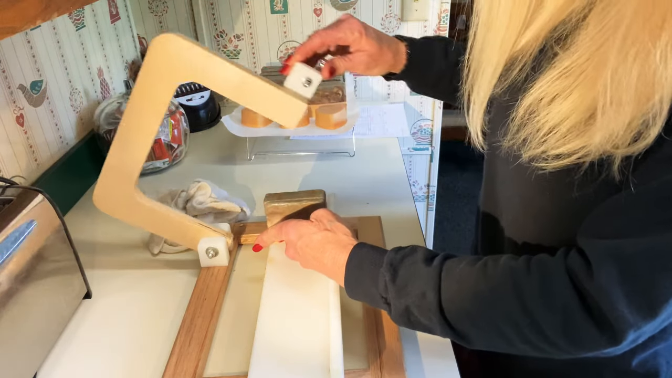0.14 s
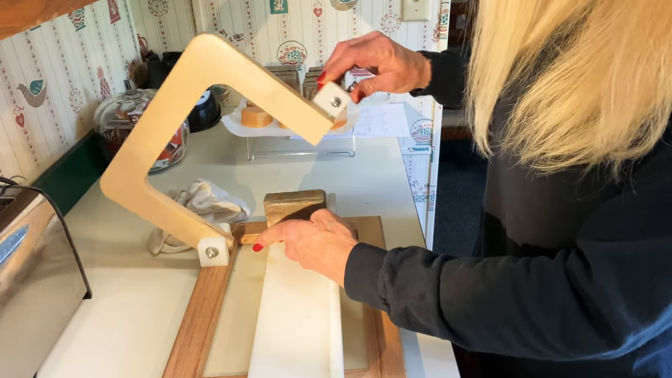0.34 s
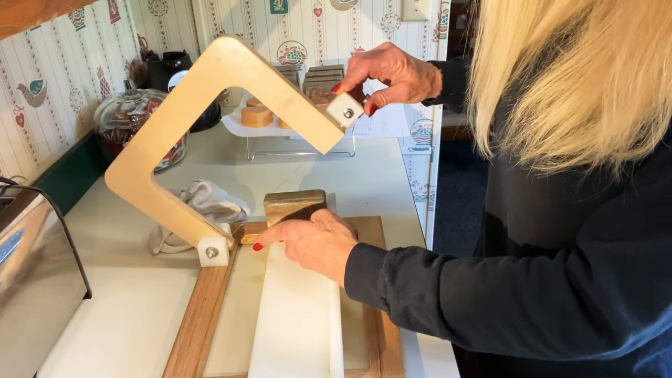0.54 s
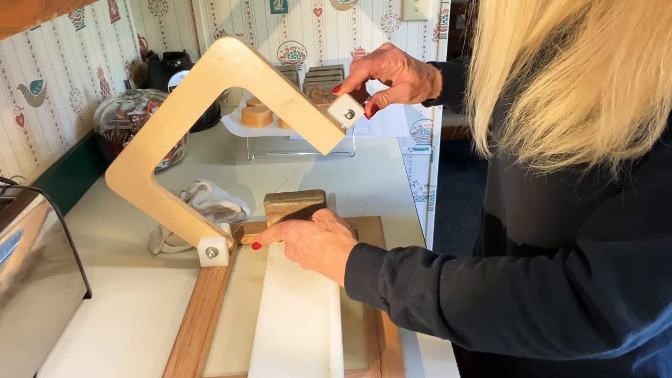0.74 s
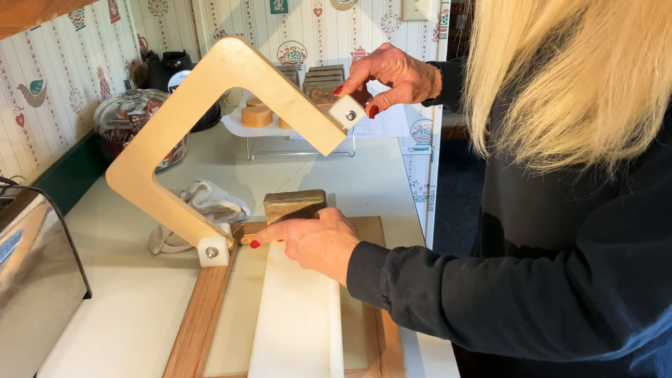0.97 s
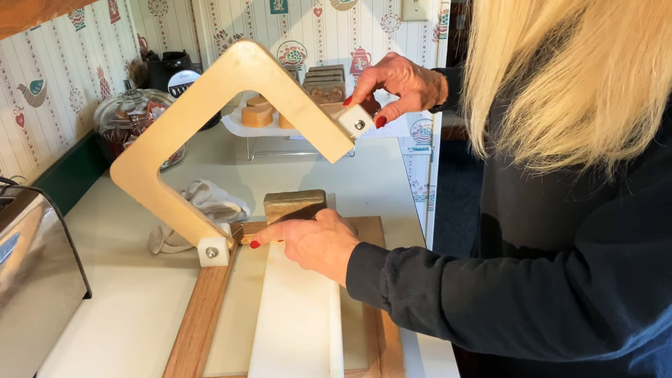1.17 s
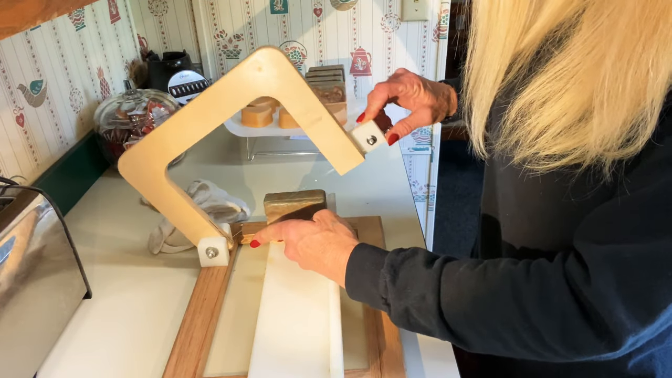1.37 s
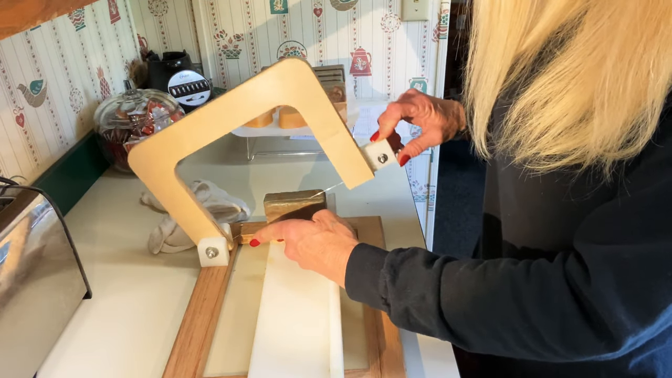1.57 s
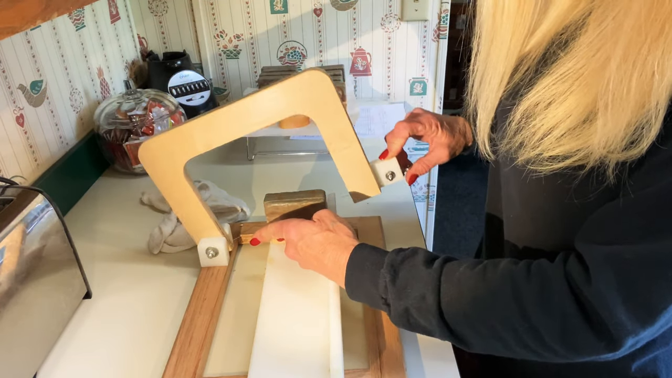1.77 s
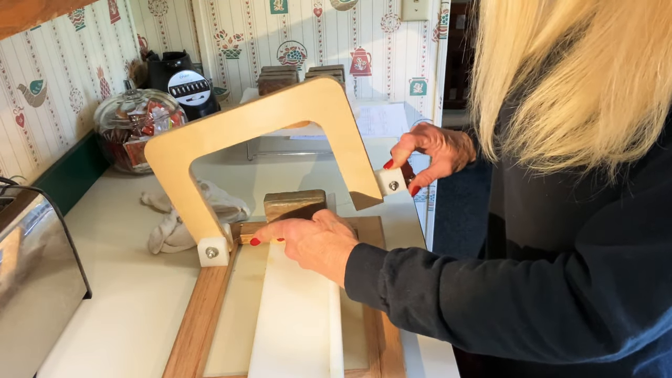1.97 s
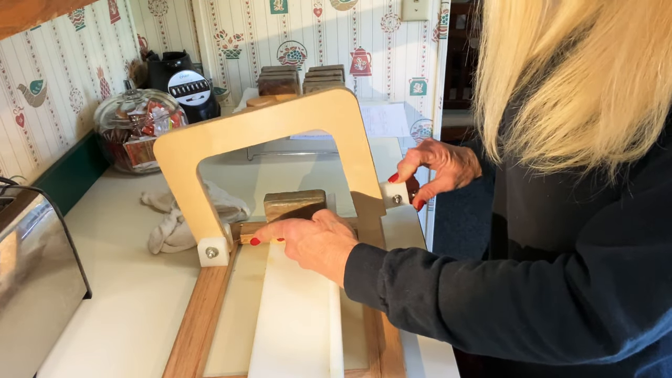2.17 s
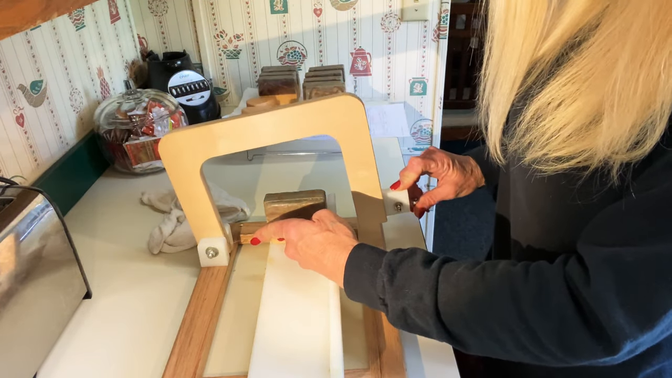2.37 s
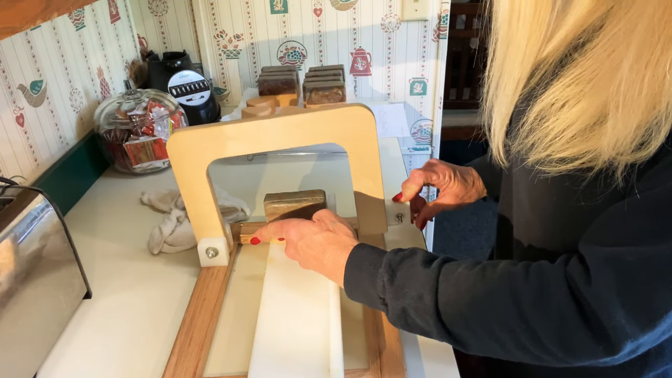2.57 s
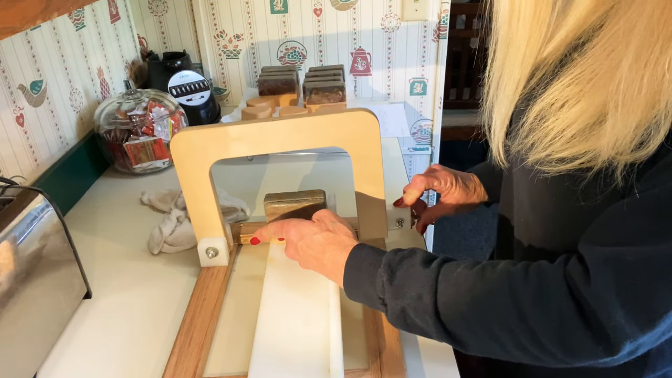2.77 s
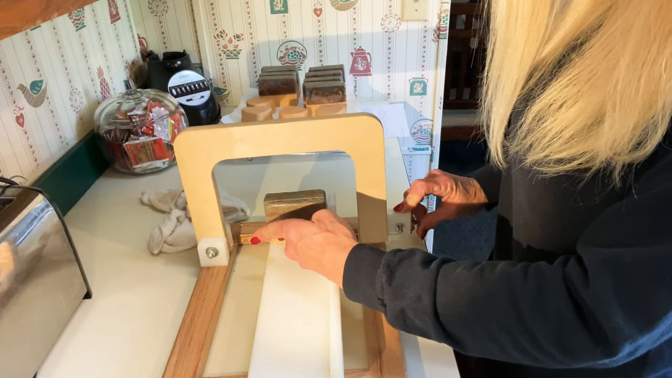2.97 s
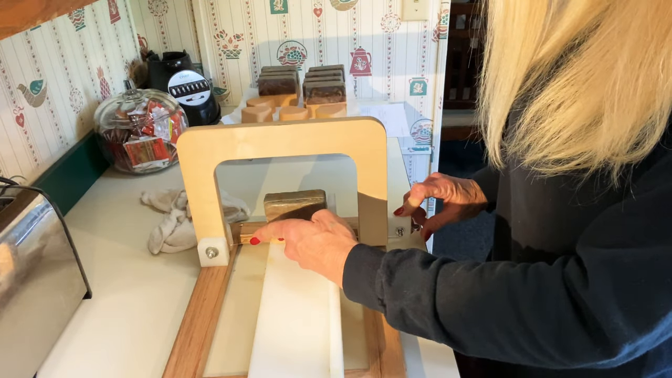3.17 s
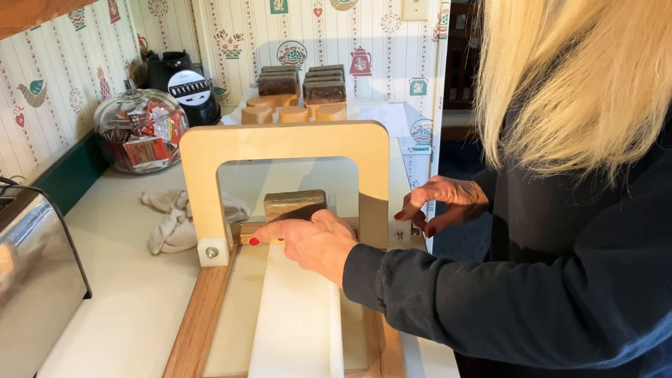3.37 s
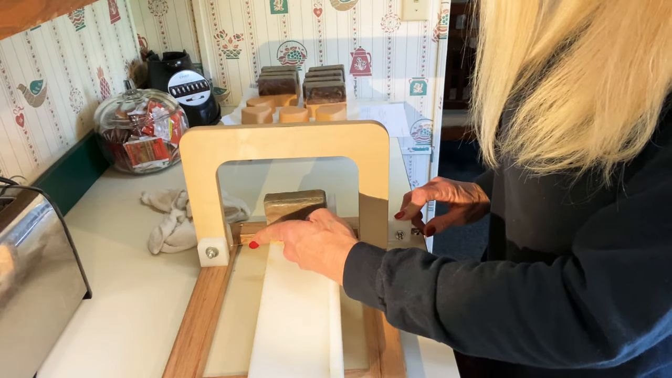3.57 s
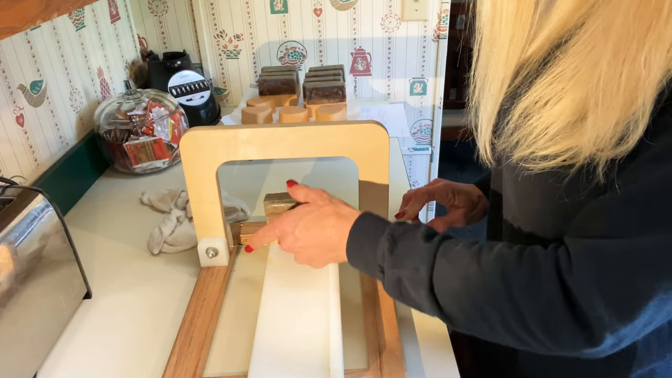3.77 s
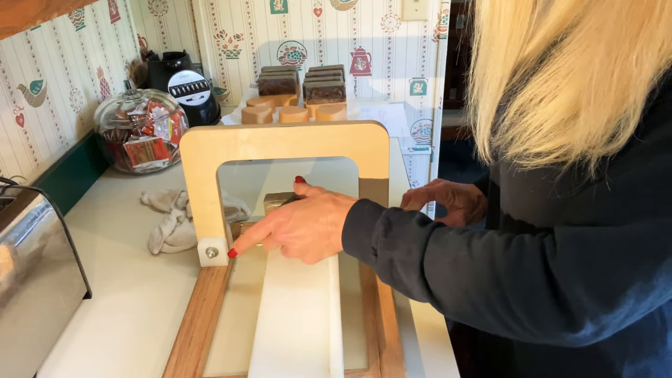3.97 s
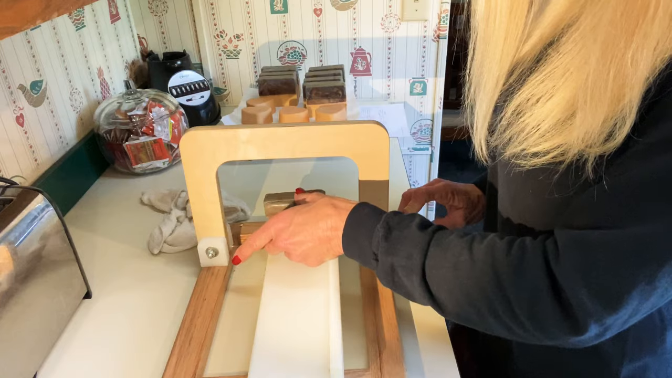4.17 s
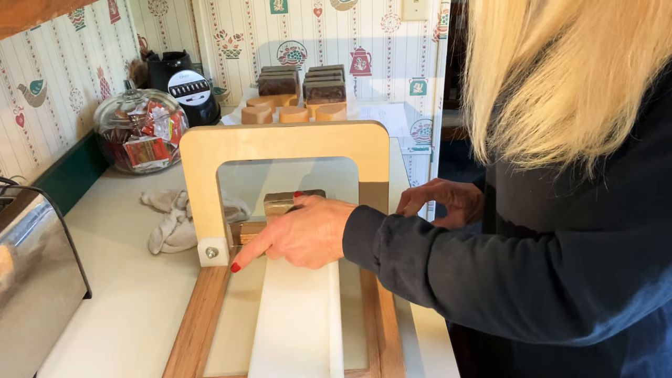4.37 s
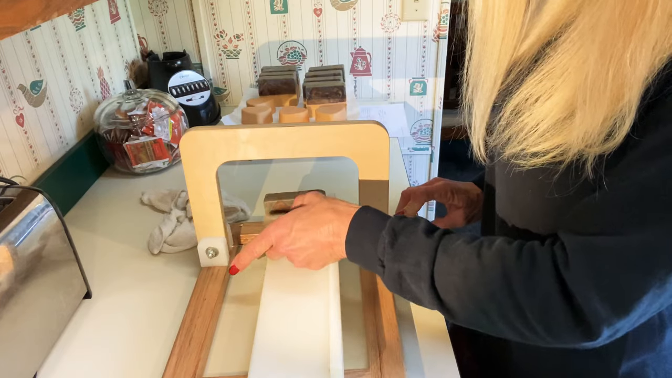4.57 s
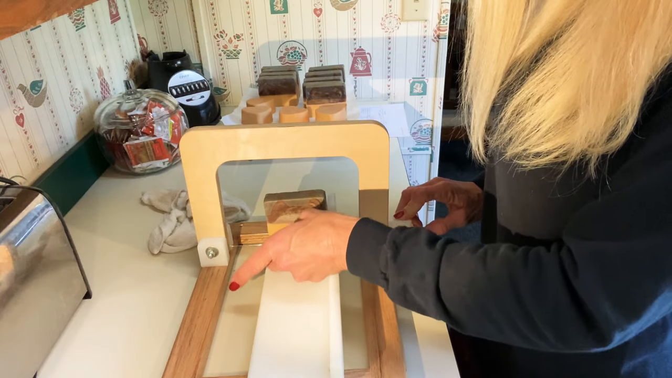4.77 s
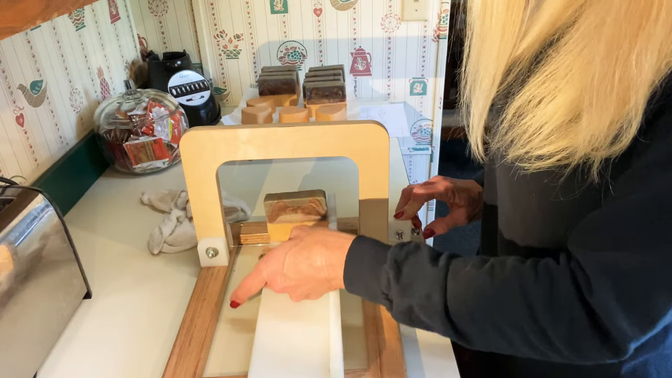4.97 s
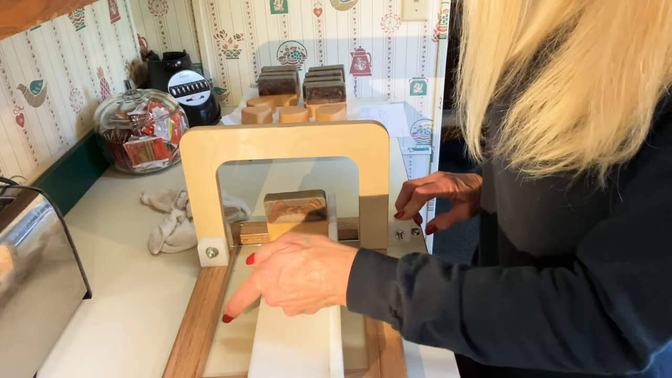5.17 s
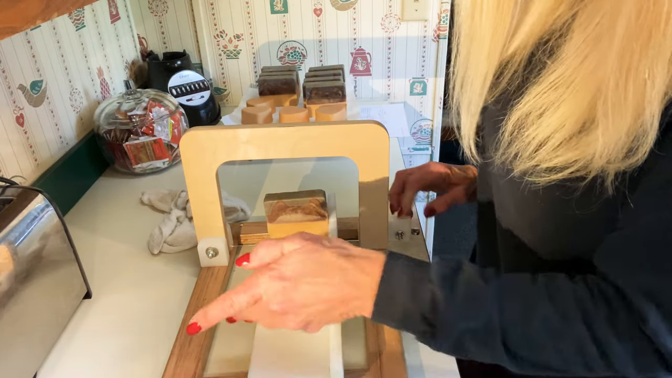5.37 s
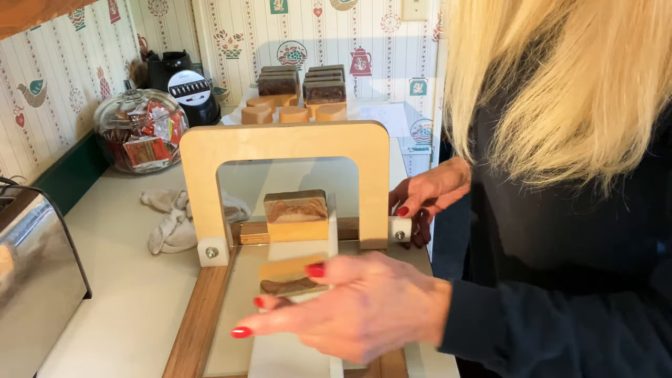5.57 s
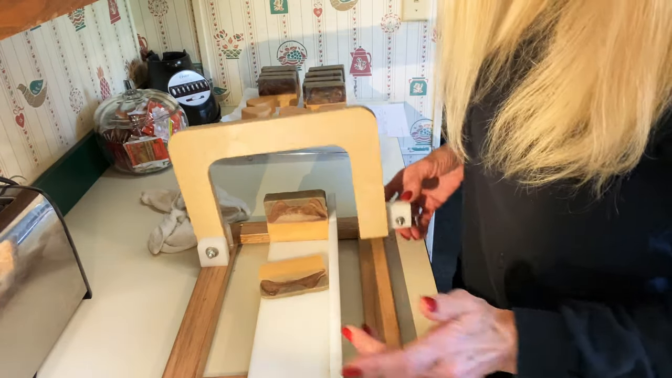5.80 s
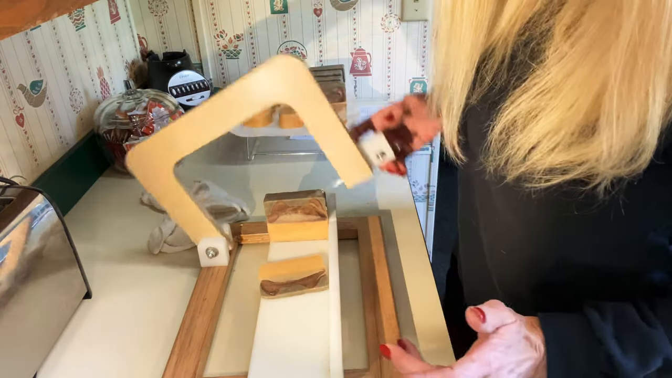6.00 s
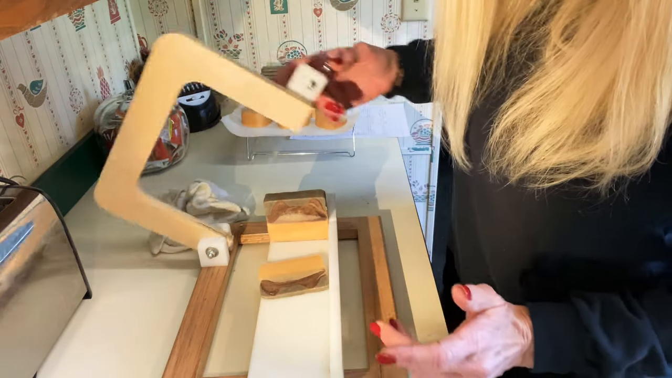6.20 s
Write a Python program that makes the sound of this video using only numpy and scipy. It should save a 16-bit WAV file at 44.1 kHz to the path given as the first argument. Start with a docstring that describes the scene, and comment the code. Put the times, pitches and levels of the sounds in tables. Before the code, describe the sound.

A faint fridge hum and soft low air noise run throughout in a small kitchen, with the action close by. At the start a wooden soap cutter bumps lightly, and its pivot rubs with a faint, thin, high squeak until 0.6 seconds. From 1.3 to 3.1 seconds the wire slips through the soap in quiet, dry, irregular ticks, busiest around 2.5, with a few soft early bumps. At 3.4 the arm strikes its base with a loud, hollow wooden knock. At 3.6 the freed wire gives a low twang and a raspy buzz, damped by 3.9, leaving a faint ring. A light click comes at 4.7. Around 5.3 the slice scrapes and drops with a loud cluster of thumps, then is pushed aside with smaller clicks and a brief slide. A soft thud follows at 5.9 as the pivot faintly rubs and squeaks again.

```python
"""A wooden-framed wire cutter swings down through a soap loaf on a kitchen counter, near a two-port
microphone. First friction makes the pivot rub and squeak; from 1.3 s the wire ticks through the soap in
small slips. At 3.4 s the arm strikes the base, and at 3.6 s the freed wire twangs and buzzes in its slot.
After 5 s the slice drops and is pushed aside, and the pivot squeaks again.
A fridge hums throughout in the small room."""
import sys
import numpy as np
from scipy import signal
from scipy.fft import rfft, irfft, next_fast_len
from scipy.io import wavfile
from scipy.ndimage import uniform_filter1d

SR = 44100
rng = np.random.default_rng(int(sys.argv[2]) if len(sys.argv) > 2 else 0)


def wav_out(sig):
    """Save sig, one row per channel (or a flat mono array), as 16-bit PCM at SR to the path in sys.argv[1]."""
    wavfile.write(sys.argv[1], SR, np.round(np.clip(np.atleast_2d(sig).T, -1, 1) * 32767).astype(np.int16))


N = 275303
T = np.arange(N) / SR
RELEASE_S = 3.641  # the wire springs free

# a finger damps the wire: t/s, gain/dB
FINGER_DAMPING = [(0, 0), (3.885, 0), (3.905, -12)]


def knocks():
    """Impact excitation: a rough contact cracks and clatters; the modes of the base answer 3.5 ms later."""
    # t/s, crack/dB, hardness/dB, top band gain/dB, thud/dB, place (0 counter, 1 board, 2 hollow edge),
    # contact time/ms, factor on the t60 (less under a hand)
    blows = [(0.087, -76, -14, -2.5, -53.5, 1.1, 8.9, .9), (0.106, -53.5, -5.5, 1, -40, 1.6, 5.7, 1),
             (0.128, -59.5, -1.5, -11, -36.5, 1.74, 16, 0.48),
             (1.148, -78, -22, -2.5, -45.5, 1.3, 17, 0.71), (1.547, -78, -10, -2.5, -47, 1.2, 2.4, 1),
             (1.679, -83, -14, -2.5, -44, 1.2, 7.2, 0.96), (3.371, -18.5, -13, -13, -25.5, 0.91, 4.1, 0.9),
             (3.378, -47, -30, -4, -15.5, .95, 4.1, 0.81), (3.399, -50, -4, 2, -20.5, 0.9, 5.8, .9),
             (3.409, -49, 3, -2, -30, 1.7, 4, .9), (3.647, -43.5, 1.5, 5, -29, 1.6, 5.1, 0.63),
             (4.654, -47.5, 0, -0.5, -40, 1.35, 4.3, 0.9), (5.151, -69.5, -0.5, 8, -40.5, 0.075, 7, 0.65),
             (5.296, -31.5, -6, 0, -25.5, 2.1, 8.3, 0.58), (5.305, -41, -22, -6, -17, 2.2, 4.2, .6),
             (5.310, -41, -20, -6, -18.5, 0.02, 6, 0.47), (5.320, -43, -24, -1, -22.5, 2.2, 5, 0.52),
             (5.344, -40.5, -32, -3, -31, 2.05, 8.4, 0.64), (5.360, -51, -5, -3, -28, 0.3, 9.9, 0.35),
             (5.496, -44, -0.5, 6, -39.5, 1.6, 14, 0.26), (5.506, -51.5, 7.5, 2, -48, 0.45, 2.4, 0.99),
             (5.509, -35.5, -42, -2.5, -34.5, 1.6, 4.9, 0.5), (5.537, -61, -9, -2.5, -52, 1.8, 6, 0.8),
             (5.559, -46.5, 0, -10, -41.5, 2.9, 5.5, 0.49), (5.594, -45.5, -17, 9, -55, 0.44, 14, 0.55),
             (5.638, -52.5, -8, -2.5, -55, 0.087, 18, 0.77), (5.91, -59.5, -5.5, -13, -35, 0.42, 9.1, 1)]
    # lower and upper resonances of the arm: f/Hz, width/Hz, level/dB
    arm_low = [(844, 78, -6.5), (980, 160, -8), (1075, 60, -10), (1243, 160, 1), (1485, 130, -6.5),
               (1670, 250, -5.5)]
    arm_high = [(2070, 450, 6), (2723, 150, 0), (3416, 233, 0), (3390, 240, 0.5), (4380, 470, -4)]
    # modes of the counter, the base board and the air beneath: f/Hz, level/dB, t60/s
    counter = [(64.8, -7.5, 0.086), (91.6, 14.5, 0.31), (116, 7, 0.193)]
    board = [(199.6, 2.5, 0.17), (231.3, 4, 0.18)]
    hollow = [(295, -1.5, 0.19), (328, -3.5, 0.11), (417, -1.5, 0.16), (459, -8, 0.14), (535, -20, 0.18)]
    # radiation of the counter: f/Hz, gain/dB
    radiation = [(30, -17), (60, 0.5), (470, -1.5), (620, -9.5)]
    cracks, thuds, t = np.zeros(N), np.zeros(N), T[:SR // 5]
    ms = 1000 * t
    push = -np.sin(np.pi * np.minimum(ms / 2.28, 1)) ** 2
    clatter = np.exp(-t / 0.034) * np.minimum(t / 0.013, 1)
    for s, crack_db, hard_db, top_db, thud_db, place, contact_ms, free in blows:
        contact = np.exp(-ms / contact_ms) * np.minimum(ms / (0.041 * contact_ms), 1)
        upper_db = crack_db + 4.5 + 0.71 * hard_db
        grit = rng.standard_normal((7, len(t)))
        for noise, modes, level_db in ((grit[0], arm_low, crack_db), (grit[1], arm_high, upper_db)):
            crack = 0
            for hz, width, db in modes:
                force = noise * contact ** (1 + hz / 4000)  # higher modes die sooner
                crack += peak(steep(force, hz, width), db + rng.standard_normal())
            add(cracks, s, peak(crack, level_db))
        rattle = grit[2] * (contact + undb(-19) * clatter)
        click = steep(rattle, 7450, 4000) + undb(top_db) * steep(rattle, 11800, 2300)
        add(cracks, s, peak(click, crack_db + 3 + 2.5 * hard_db))
        # the clatter is too dense to show single modes
        add(cracks, s, peak(steep(grit[3] * clatter, 1300, 1000), crack_db - 11.5))
        add(cracks, s, peak(steep(grit[4] * clatter, 2800, 1900), upper_db - 13))
        rough = grit[5] * contact * np.minimum(ms / 2.5, 1)
        rough = np.convolve(rough, np.hanning(int(0.0018 * SR)))[:len(t)]
        thud = peak(steep(grit[6] * clatter, 269, 475), thud_db - 9)
        for k, modes in enumerate((counter, board, hollow)):
            body = ring(push + peak(rough, -8), np.array(modes) * [1, 1, free])
            thud += peak(body, thud_db - 11 * (place - k) ** 2)  # weaker away from the blow
        add(thuds, s + 0.0035, thud)
    return cracks + colour(thuds, radiation)


def wire_twang():
    """Free vibration: the released wire rings in decaying modes, most of them then damped by a finger."""
    # force pulses on release: t/s, level/dB
    plucks = [(3.645, -27), (3.6535, -26.5), (3.662, -18)]
    # main modes, faint after-ring and upper partials of the wire: f/Hz, level/dB, t60/s
    modes = [(110, -13, 0.28), (231.5, -4, 0.51), (429, -7, 0.15), (464, -17, 0.33), (575, -43, 0.38),
             (742, -20, 0.32)]
    after_ring = [(245.4, -39.5, 3.4)]
    overtones = [(1220, -12.5, 1), (1530, -2, 1), (1483, 8, 0.29), (1870, -5.5, 0.96), (1970, -9, 0.51),
                 (2170, -11, 0.96), (2480, -3, 0.28), (2692, -23, .9), (2910, -6, 0.84), (2940, -8, 0.43),
                 (3470, -13, 0.76), (3720, 1, 1), (3700, -8.5, .9), (4030, -14, .8)]
    push, snap = np.zeros(N), np.zeros(N)
    for s, db in plucks:
        add(push, s, undb(db) * np.diff(np.hanning(100)))
    snap[int(RELEASE_S * SR)] = undb(-54)
    touch = undb(np.interp(T, *np.transpose(FINGER_DAMPING)))
    shimmer = sum(ring(snap, [mode]) * undb(4 * walk(44.5)) for mode in overtones)
    return ring(push, modes) * touch + ring(push, after_ring) + shimmer * touch ** 3


def wire_buzz():
    """Periodic collision: the wire slaps its slot once a cycle, in bursts over a steadily fading buzz."""
    # bursts of slaps: t/s, level/dB, length/s
    slap_bursts = [(3.640, -49.5, 0.036), (3.691, -49, 0.0255), (3.748, -52, 0.022), (3.778, -52.5, 0.02),
                   (3.814, -54, 0.025), (3.84, -59.5, 0.02), (3.887, -72, 0.017), (3.914, -77, 0.0092)]
    # three groups of slot resonances: f/Hz, width/Hz, level/dB
    high = [(5820, 620, 4), (12500, 3600, -1.5)]
    middle = [(3637, 200, 5), (4700, 560, -6.5), (4020, 3800, -2)]
    broad = [(1348, 680, 6), (2170, 290, -0.5), (3060, 880, 8), (7700, 1200, -3.5), (8660, 590, -3)]  # the steadier rasp, from 1.3 to 8.7 kHz
    # drive of each group: burst gain/dB, burst fade/(dB/s), steady level/dB, steady t60/s
    drives = [(2, 6, -65, 0.6), (-4, -5, -54, 0.52), (-2, 31, -47.5, 0.71)]
    bursts, rise_s, fall_s = 0, 0.0048, 0.0025
    for s, db, length in slap_bursts:
        bursts += undb(db) * np.clip((T - s) / rise_s, 0, 1) * np.clip((s + length - T) / fall_s + 1, 0, 1)
    cycles = np.cumsum(234.3 * (1 + 0.0065 * walk(90))) / SR
    slaps = unit(np.diff(np.floor(cycles), prepend=0)) + 0.75 * rng.standard_normal(N)
    touch = undb(np.interp(T, *np.transpose(FINGER_DAMPING)))
    age, out = np.maximum(T - RELEASE_S, 0), 0
    for slot, flicker_db, drive in zip((high, middle, broad), (2, 4.5, 3), drives):
        burst_db, fade_db, steady_db, t60 = drive
        steady = np.minimum(age / rise_s, 1) * undb(steady_db - 60 * age / t60) * touch
        envelope = np.hypot(bursts * undb(burst_db - fade_db * age), steady)
        out += envelope * unit(resonate(slaps, slot, flicker_db, rate=40))
    return out


def soap_ticks():
    """Stick-slip: each slip of the wire in the soap is a dry crackle at 3-4 kHz with a bright fizz."""
    # t/s, body peak/dB, f/Hz, top fizz against the body/dB
    slips = [(1.2877, -53.5, 3300, -49), (1.494, -62.5, 3760, -32), (1.793, -64.5, 4000, -32),
             (1.978, -72, 3570, 14), (2.011, -72, 3590, 20), (2.0294, -81, 3310, 27),
             (2.102, -68, 3400, -7), (2.138, -59.5, 3600, -2), (2.334, -66, 3470, -8),
             (2.4048, -51.5, 3730, 6.5), (2.4175, -62, 3430, -18), (2.4867, -44, 3440, -4),
             (2.517, -65, 3320, -22), (2.594, -53.5, 3340, -13), (2.6208, -58.5, 3130, -9),
             (2.642, -66, 3220, -9), (2.783, -73, 3250, -25), (2.82, -62.5, 3300, 7),
             (2.829, -58.5, 3370, -2), (2.887, -74, 3200, -24), (2.9184, -64.5, 3200, -35),
             (3.022, -55, 3440, -9), (3.1097, -60.5, 3440, -5), (3.124, -68.5, 3350, -22.5),
             (4.311, -64.5, 3380, -8)]
    out, t = np.zeros(N), T[:SR // 5]
    decay = np.exp(-t / 0.0026) + undb(-19.5) * np.exp(-t / 0.022)
    for s, db, hz, bright_db in slips:
        grit = rng.standard_normal((3, len(t))) * decay
        body = steep(grit[0], hz, 950) + 0.25 * steep(grit[0], 1.5 * hz, 2600)
        fizz = peak(steep(grit[1], 7970, 4300), db + 0.5 + 0.41 * bright_db)
        top = peak(steep(grit[2], 13000, 2400), db + bright_db)
        add(out, s, peak(body, db) + fizz + top)
    return out


def rubbing():
    """Sliding friction: dense grit drives resonances as the pivot turns and the soap slides on the board."""
    # resonances of the pivot, the soap and their common treble: f/Hz, width/Hz, level/dB
    pivot_bands = [(233, 110, 12), (480, 125, 12.5), (890, 770, 5), (1235, 72, -3), (1565, 96, -5.5),
                   (1910, 97, -5), (2180, 77, -11), (2900, 200, -9), (3790, 78, -10), (4330, 220, -6),
                   (4870, 790, -11), (2940, 3700, 6.5)]
    soap_bands = [(388, 300, 10), (1070, 410, -2), (1270, 200, -5), (1620, 340, 5), (2230, 260, -1),
                  (2830, 470, 4), (3580, 250, -3.5), (4160, 1100, -4), (8200, 390, -13)]
    treble_bands = [(5900, 4800, 3), (7280, 740, 2.5), (9200, 470, -29), (12300, 8800, -15)]
    # moves of arm and soap: loudest t/s, gain/dB, rise/(dB/s), fall/(dB/s), treble gain/dB
    turns = [(.118, -73.5, 60, 30.5, -13.5), (6.05, -72, 44, 28, -4.5)]
    slides = [(5.002, -85.5, 200, 132.5, -10), (5.215, -76.5, 150, 202, -11), (5.264, -63, 256, 348, -26),
              (5.514, -58.5, 3001, 145, -9.5)]
    grit = rng.standard_normal(N) * undb(1.7 * rng.exponential(size=N))
    pivot, soap, treble = (resonate(grit, bands, 2.2) for bands in (pivot_bands, soap_bands, treble_bands))
    out = 0
    for body, moves in ((pivot, turns), (soap, slides)):
        for s, db, rise, fall, treble_db in moves:
            drop_db = np.where(T < s, rise * (s - T), fall * (T - s))
            envelope = undb(db - drop_db - 0.037 * drop_db ** 2)  # steeper as the move slows
            out += envelope * (body + undb(treble_db) * treble)
    return out


def pivot_squeaks():
    """Frictional oscillation: the pivot sings a thin, wavering tone that glides faster towards its end."""
    # t/s, length/s, first f/Hz, last f/Hz, level/dB, fade/dB
    squeaks = [(0, 0.091, 6000, 5900, -81, 13), (0.131, 0.37, 6150, 5530, -71, 14),
               (0.509, 0.075, 5880, 5790, -83.5, -5), (5.818, 0.11, 5980, 6420, -82, -12),
               (5.9, 0.057, 5800, 5700, -75, -4), (5.982, 0.21, 9440, 9140, -80, -2),
               (6.198, 0.083, 6100, 6050, -74, 0)]
    out = 0
    for s, length, first_hz, last_hz, db, fade_db in squeaks:
        progress = np.clip((T - s) / length, 0, 1)
        hz = (first_hz + (last_hz - first_hz) * progress ** 1.5) * (1 + 0.011 * walk(500))
        gate = np.clip(np.minimum(T - s, s + length - T) / 0.029, 0, 1)
        out += gate * undb(db - fade_db * progress + 2 * walk(90)) * tone(hz)
    return out


def pings():
    """Damped resonance: small, far rings, each a narrow band of decaying noise."""
    # t/s, peak level/dB, f/Hz, t60/s
    rings = [(1.873, -60, 1600, 0.31), (4.24, -76.5, 3720, 0.16), (4.851, -66.5, 1740, 0.2)]
    out, t = np.zeros(N), T[:SR // 5]
    for s, db, hz, t60 in rings:
        grit = rng.standard_normal(len(t)) * np.minimum(t / 0.0018, 1) * undb(-60 * t / t60)
        add(out, s, peak(steep(grit, hz, 250), db))
    return out


def fridge_hum():
    """Forced vibration: the fridge gives steady tones that waver slightly in pitch and level."""
    # f/Hz, rms level/dB
    tones = [(64.6, -72.5), (344.5, -64), (689.1, -78), (1707, -91)]
    return sum(undb(db + 0.43 * walk(11)) * tone(hz * (1 + 0.00297 * walk(8))) for hz, db in tones)


def kitchen_air():
    """Broadband air and motor noise, its bass flickering, with a resonance of the fridge fan's housing."""
    # f/Hz, relative spectral density/dB
    spectrum = [(12, -62), (20, -11), (66, -0.5), (115, -6), (174, -8), (199, -11.5), (347, -14),
                (377, -13), (693, -21), (1140, -34.5), (3270, -47.5), (7510, -50.5), (10500, -52),
                (13100, -48.5), (15000, -70)]
    air = colour(rng.standard_normal(N), spectrum)
    air += band(air, 80, 260) * (undb(2.43 * walk(7.4)) - 1)
    fan = undb(-33.5 + 2 * walk(16)) * unit(steep(rng.standard_normal(N), 1744, 420))
    return undb(-55.5) * (unit(air) + fan)


def reverberation(x):
    """Diffuse reflection: the room's impulse response is noise that dies away band by band."""
    # f/Hz, level/dB, t60/s
    bands = [(150, -8, 0.21), (433, 3.5, 0.43), (1400, 2.5, 0.35), (4127, -11, 0.22), (9780, 2.5, 0.25)]
    t = T[:int(0.6 * SR)]
    noise = rng.standard_normal(len(t)) * np.minimum(t / 0.0035, 1)
    response = sum(steep(noise, hz, 2.03 * hz) * undb(db - 60 * t / t60) for hz, db, t60 in bands)
    return undb(-10) * signal.fftconvolve(x, response / np.sqrt(0.025 * SR))[:N]


def ring(force, modes):
    """Modal superposition: a force drives damped modes (f/Hz, level/dB, t60/s)."""
    out = 0
    for hz, db, t60 in modes:
        pole = np.exp(2j * np.pi * hz / SR - np.log(1000) / (t60 * SR))
        out += undb(db) * signal.lfilter([1], [1, -pole], force).imag
    return out


def resonate(x, bands, flicker_db, rate=20):
    """Parallel resonances of alternating sign, each flickering on its own."""
    return sum((-1) ** k * undb(db + flicker_db * walk(rate)) * unit(steep(x, hz, width))
               for k, (hz, width, db) in enumerate(bands))


def band(x, hz, width):
    """Resonance with gain 1 at the centre."""
    return signal.lfilter(*signal.iirpeak(hz, hz / width, fs=SR), x)


def steep(x, hz, width):
    """Two equal resonances in cascade."""
    return band(band(x, hz, width), hz, width)


def colour(x, spectrum):
    """Zero-phase filtering by a spectrum (f/Hz, gain/dB)."""
    hz, db = np.transpose(spectrum)
    size = next_fast_len(len(x))
    log_f = np.log(np.maximum(np.fft.rfftfreq(size, 1 / SR), 1))
    return irfft(rfft(x, size) * undb(np.interp(log_f, np.log(hz), db)), size)[:len(x)]


def walk(rate, step=16):
    """Random modulation: levels held 1 / rate s and smoothed twice; spread near 1."""
    hold, count = int(SR / rate / step), N // step + 2
    levels = np.repeat(rng.standard_normal(count // hold + 1), hold)
    smooth = uniform_filter1d(uniform_filter1d(levels, hold), hold)[:count]
    return 1.3 * np.interp(np.arange(N) / step, np.arange(count), smooth)


def tone(hz):
    """Sine of unit rms whose phase is the integral of frequency."""
    return np.sqrt(2) * np.sin(2 * np.pi * np.cumsum(hz) / SR)


def undb(db):
    return 10 ** (np.asarray(db) / 20)


def unit(x):
    return x / np.sqrt(np.mean(x ** 2))


def peak(x, db):
    return x * undb(db) / np.max(np.abs(x))


def add(out, s, x):
    i = int(s * SR)
    out[i:i + len(x)] += x[:N - i]


def scene():
    """Superposition at two ports: direct sound, scatter and reverberation form mid and side signals."""
    # side against mid, for the counter sounds and the background: f/Hz, gain/dB
    near_ports = [(60, -18.5), (110, -14), (200, -18.5), (380, -7), (700, 4), (1290, -1), (2380, 0),
                  (4400, 0), (8120, -1), (15000, 2.5)]
    far_ports = [(60, -19), (110, -8.5), (200, -11), (380, -4), (700, 1.5), (1290, 1), (2380, -1),
                 (4400, 1.5), (8120, -4.5), (15000, 9)]
    twang, buzz = wire_twang(), wire_buzz()
    near = knocks() + soap_ticks() + pings() + twang + buzz + rubbing() + pivot_squeaks()
    room_feed = near - twang * (1 - undb(-8))  # the low twang stays close
    air, hum = kitchen_air(), fridge_hum()
    # the counter top scatters sound differently to the two ports within a few ms
    t = T[:int(0.03 * SR)]
    scatter = rng.standard_normal(len(t)) * np.exp(-t / 0.003)
    scatter *= undb(-10) / np.sqrt(np.sum(scatter ** 2))
    mid = near + reverberation(room_feed) + air + hum
    lead = undb(-2.5) * signal.hilbert(near, next_fast_len(N)).imag[:N]  # one port is reached first
    near_side = signal.fftconvolve(near, scatter)[:N] + lead + reverberation(room_feed)
    far_side = signal.fftconvolve(hum, scatter)[:N] + kitchen_air()
    side = colour(near_side, near_ports) + colour(far_side, far_ports) - 0.3 * buzz  # buzz leans right
    return np.array([mid + side, mid - side]) * undb([[0.5], [-0.5]])


def record(dry):
    """Frequency response: the microphone loses deep bass, a band near 10 kHz and all above 15.9 kHz."""
    # f/Hz, gain/dB
    response = [(25, -9.5), (55, -0.5), (9500, -4), (10100, -17), (10900, -18), (11400, -10.5),
                (14000, -10.5), (14800, -15)]
    heard = np.array([colour(x, response) for x in dry])
    return signal.sosfilt(signal.ellip(8, 0.2, 70, 15900, fs=SR, output="sos"), heard)


dry = scene()
out = record(dry)
wav_out(out)
```